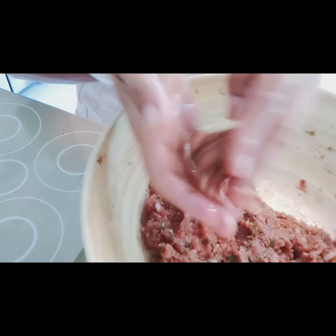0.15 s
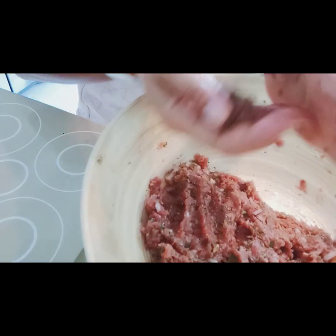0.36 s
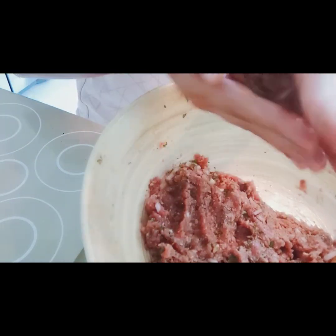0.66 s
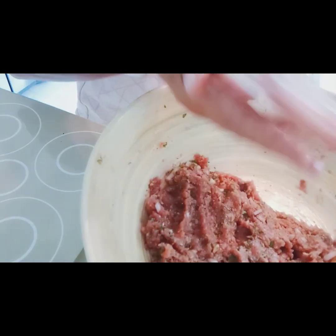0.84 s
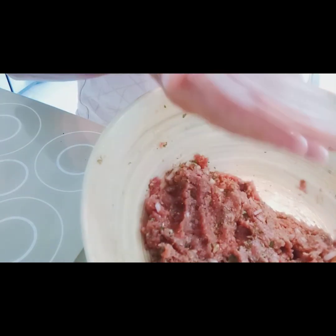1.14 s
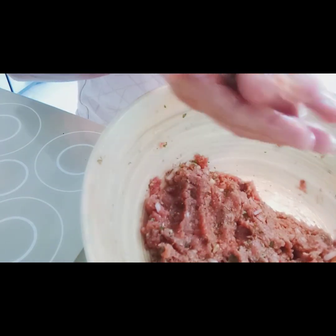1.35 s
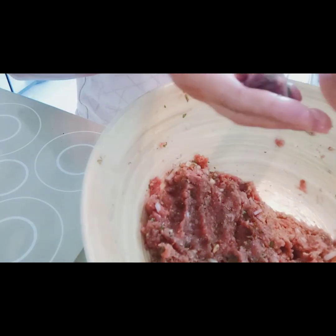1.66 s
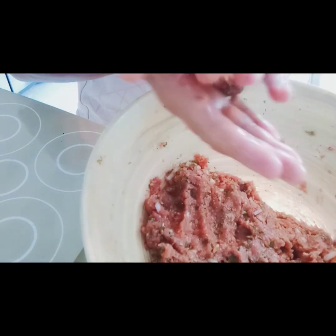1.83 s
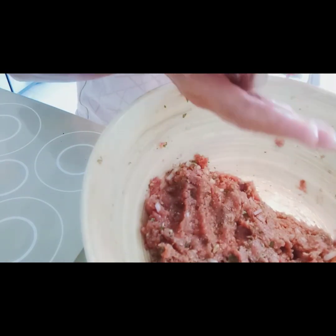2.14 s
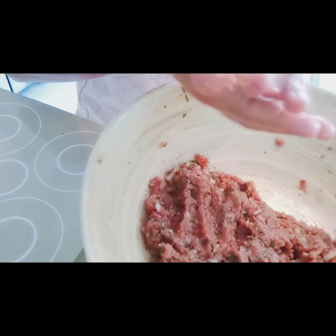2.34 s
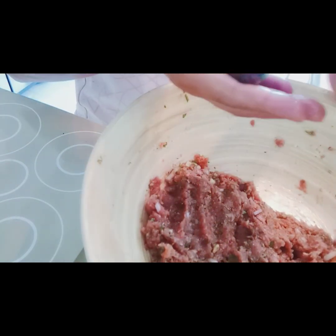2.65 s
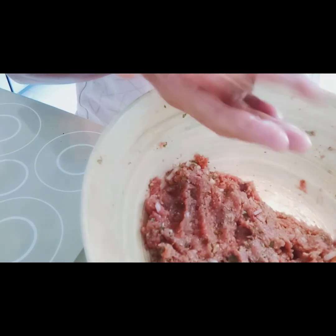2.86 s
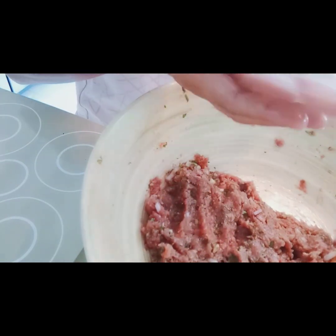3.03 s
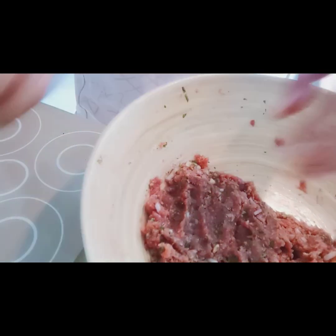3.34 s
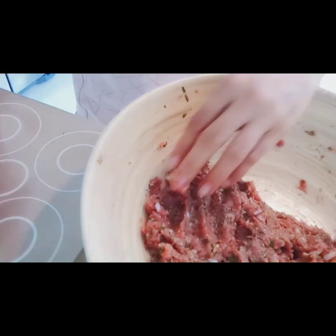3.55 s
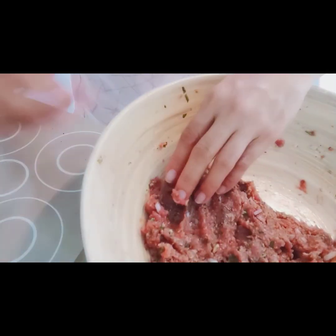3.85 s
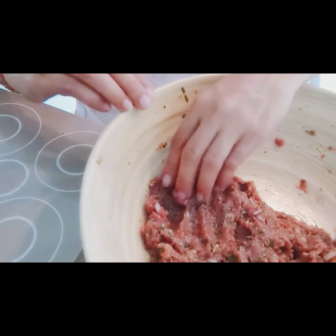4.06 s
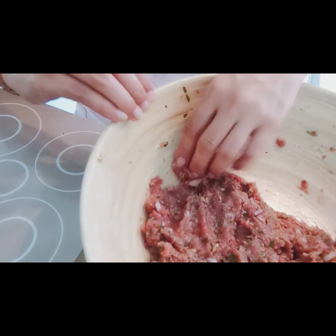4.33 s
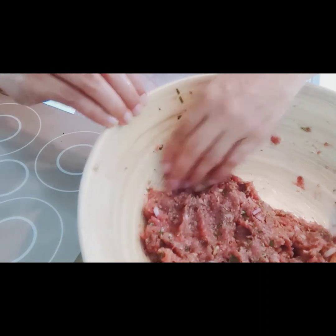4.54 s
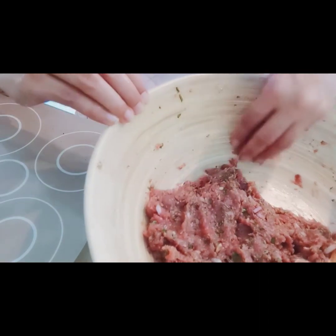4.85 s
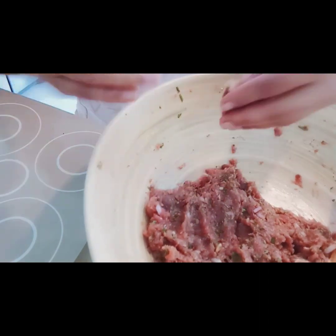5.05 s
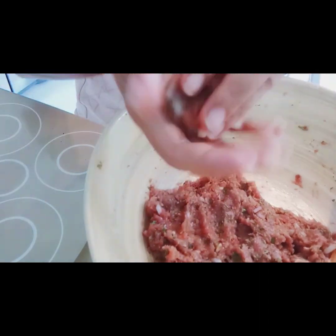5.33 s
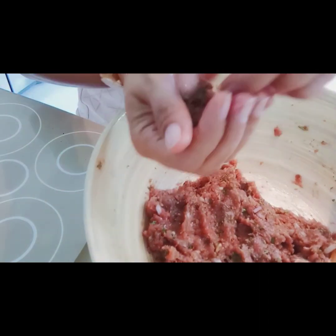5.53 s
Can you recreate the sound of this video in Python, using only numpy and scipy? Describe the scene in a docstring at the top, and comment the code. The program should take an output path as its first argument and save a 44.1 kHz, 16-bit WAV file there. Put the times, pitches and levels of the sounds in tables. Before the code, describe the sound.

In a small kitchen with short reverberation, a steady low hum and muffled rush lie under delicate, close meat handling. A dull soft slap and sparse sticky clicks come first; a hollow drawer rumble swells and booms in the middle, then a shorter roll ends in a knock. Wet crackling pops then cluster loudly as meat is pulled from the bowl, before a final crisp slap and tiny squeak.

```python
"""Hand-rolled meat and a drawer

Wet hands roll a meatball, then pinch fresh meat from a bowl: dense small air resonances give the smearing,
and pops, sharp snaps and slaps mark the meat letting go of the skin or meeting it. Something like a drawer
rumbles open on its runners (random impacts exciting box modes), rolls back and shuts with a knock.
A faint squeak follows; a fridge hums in harmonics of its shaft rate under a steady filtered-noise rush."""
import sys
import numpy as np
from scipy import signal
from scipy.fft import rfft, irfft
from scipy.io import wavfile
from scipy.ndimage import uniform_filter1d

SR = 44100
rng = np.random.default_rng(int(sys.argv[2]) if len(sys.argv) > 2 else 0)


def transcribe(u):
    """Save the signal u as a 16-bit wav file named by the first command-line argument.

    u: samples, shape (n,) or (channels, n), limited to [-1, 1]; the rate is SR.
    q: integer samples, one column per channel.
    """
    v = np.clip(np.atleast_2d(u).T, -1, 1)
    q = np.round(v * 32767).astype(np.int16)
    wavfile.write(sys.argv[1], SR, q)


N = 250929
TIME = np.arange(N) / SR

# Levels in the tables are relative; each source may add its own gain.
# Two spells of soft rubbing: meat in the palms, ending in a faint swish, then in the bowl:
# [t/s, rubbing level/dB]
RUBBING = [
    [(0.3, -75.5), (0.72, -64.5), (1.05, -66.5), (1.4, -90), (1.78, -69), (2.5, -82), (3.1, -71),
     (3.28, -65.5), (3.45, -64.5)],
    [(3.9, -66.5), (4.2, -64), (4.42, -68.5), (4.63, -63), (5.1, -72)],
]
# Meat peeling off the skin: [t/s of letting go, level/dB, length/s]
PEELS = [(0.547, -83, 0.088), (0.728, -77, 0.084), (0.82, -78, 0.035), (1.07, -79, 0.12),
         (1.635, -78, 0.014), (1.703, -74, 0.023), (1.798, -72.5, 0.046), (2.003, -73, 0.055),
         (2.184, -78, 0.056), (2.348, -77.5, 0.035), (2.772, -72.5, 0.022), (2.865, -69.5, 0.051),
         (3.066, -75, 0.033), (4.107, -70.5, 0.055), (4.203, -65, 0.031), (4.333, -68.5, 0.035),
         (4.63, -73, 0.054), (4.777, -84, 0.32), (4.957, -69, 0.035)]
# Larger air pockets opening in the meat: [t/s, level/dB, f/Hz of the pocket]
AIR_POPS = [(0.5241, -43.5, 2150), (0.6387, -44.5, 3260), (0.756, -45, 2030), (0.8202, -44, 1730),
            (0.9338, -38.5, 2880), (1.042, -37, 2030), (1.2694, -43.5, 1990), (1.9753, -38.5, 1960),
            (2.149, -34.5, 2980), (2.8659, -42.5, 3260), (4.0913, -37, 3700), (4.0937, -37, 2910),
            (4.1107, -40, 4000), (4.1229, -45, 3340), (4.2145, -35, 3520), (4.3071, -26, 3500),
            (4.3141, -43, 4260), (4.3307, -38, 3270), (4.5878, -40, 3790), (4.6096, -39, 3230),
            (4.6137, -33.5, 3300), (4.6204, -28.5, 3400), (4.638, -38, 2670), (4.6563, -40, 4050),
            (4.9599, -37.5, 3300), (5.4668, -32, 3220)]
# Sticky threads snapping off the skin; the last tick is the bright edge of the final slap:
# [t/s, level/dB, spectral tilt/(dB per octave)]
SHARP_TICKS = [(0.3525, -49.5, 7), (0.4394, -53, 12), (0.528, -49.5, 1), (0.6916, -58, 5),
               (0.7025, -54, -6), (0.739, -58, 11), (0.7564, -47, 5), (0.8301, -51, 9), (1.331, -53, 2),
               (1.6836, -57, 0), (1.7096, -59, -2), (1.783, -53, -8), (1.794, -53, 1), (1.8238, -52, 1),
               (1.8898, -58, 6), (1.981, -55, 6), (2.021, -51, 9), (2.0339, -45.5, 8), (2.179, -52, -1),
               (2.3358, -54, -5), (2.3708, -58.5, 13), (2.759, -49, 2), (2.771, -52, 0), (2.7763, -48, -21),
               (2.8544, -50, -3), (3.0557, -52, -3), (3.0717, -52, 9), (3.0906, -52.5, -12),
               (3.9755, -55, -2), (4.0567, -56, 10), (4.0834, -51, 2), (4.1652, -52, 6), (4.1964, -50, 4),
               (4.2107, -48, -3), (4.28, -48, -4), (4.3073, -30, -24), (4.3335, -44, -10),
               (4.3631, -55, -8), (4.5607, -55, 12), (4.5737, -45, -25), (4.588, -41.5, 3),
               (4.773, -47.5, -22), (4.8682, -52, -27), (4.973, -50, -4), (5.4938, -46, 0)]
# Soft slaps of meat on skin: [t/s, level/dB, f/Hz of the squeezed air]
SLAPS = [(0.179, -39.5, 554), (4.3438, -35.5, 2150), (5.493, -30, 2000), (5.496, -47, 2220)]
# Spectrum of squelching meat: [f/Hz, level/(dB per Hz)]
SMEAR_SPECTRUM = [(900, -5.5), (1400, 2), (2000, 6), (3600, 5), (4400, -6), (5300, -32), (9000, -33)]
# Spectrum of sharp snaps and crackle: [f/Hz, level/(dB per Hz)]
SNAP_SPECTRUM = [(2000, -7), (3600, 10), (4700, 3), (5500, -8), (6600, 0.5), (7600, -4), (8800, 2.5),
                 (10300, -9), (15500, -9)]
# Drawer pulled out, then pushed shut:
# [start t/s, end of push t/s, time to get going/s, rumble level/dB, slowing/(dB per s)]
DRAWER_RUNS = [(1.718, 2.637, 0.17, -31, 38.5), (3.295, 3.624, 0.11, -37.5, 59)]
# Rollers hitting bumps; the last row is the low boom of the drawer shutting: [t/s, level/dB]
BOX_BOOMS = [(2.07, -34), (2.422, -28.5), (2.505, -20.5), (2.674, -30), (2.938, -36.5), (3.438, -35.5),
             (3.595, -28)]
# Modes of the drawer box: [f/Hz, level/dB, t60/s]
BOX_MODES = [(265, -6, 0.073), (303.5, 4, 0.085), (340.8, 10, 0.16), (686, -11, 0.14)]
# Grinding spectrum of the runners: [f/Hz, level/(dB per Hz)]
RUNNER_SPECTRUM = [(130, -43.5), (220, -11), (270, 3), (350, 0), (410, -27.5), (490, -11.5), (590, -20),
                   (690, -17), (900, -26.5), (1010, -22.5), (1400, -40.5), (2500, -43.5), (5000, -81)]
# Drawer rubbing past its catch, then hitting its stop:
# [t/s, level/dB, rise/s, clatter t60/s, spectral tilt/(dB per octave)]
KNOCKS = [(3.546, -39, 0.0077, 0.14, -9), (3.5898, -41.5, 0.00039, 0.35, 1.5)]
# Spectrum of the knocked wood: [f/Hz, level/(dB per Hz)]
WOOD_SPECTRUM = [(400, -11), (850, -5.5), (1150, 2), (1330, 4.5), (1620, 6), (2000, -6), (2800, -2),
                 (4200, -5.5), (5400, -15.5), (5800, -37), (9000, -46)]
# Modes of the cabinet: [f/Hz, level/dB, t60/s]
CABINET_MODES = [(1155, -1.5, 0.46), (1580, 4.5, 0.18), (1790, -3, 0.11), (2730, -7, 0.11),
                 (3920, -6, 0.18)]
# Harmonics of the compressor shaft: [multiple of SHAFT_HZ, rms level/dB before wavering]
SHAFT_HARMONICS = [(1, -48.5), (2, -46.5), (3, -62), (5, -58.5), (6, -61.5), (7, -60), (8, -66), (12, -67),
                   (13, -70), (15, -66), (62, -76.5)]
# Further tones of the fridge: [f/Hz, rms level/dB before wavering]
FRIDGE_TONES = [(43.4, -67.5), (69.6, -57.5), (129, -62), (241, -58.5)]
# Steady rush of the kitchen: [f/Hz, level/(dB per Hz)]
AIR_SPECTRUM = [(32, -27.5), (65, 0.5), (120, 3.5), (175, 0.5), (270, 6), (370, 3.5), (480, -9), (620, -4),
                (680, -1), (860, -3), (1000, -10), (1600, -16), (2500, -20), (3600, -22), (4500, -35),
                (5300, -47), (9000, -48), (15000, -53.5)]
# Reverberation time of the kitchen: [f/Hz, t60/s]
ROOM_DECAY = [(200, 0.21), (2000, 0.2), (5000, 0.17), (12000, 0.15)]

SMEAR_PER_S, CRACKLE_PER_S, SMEAR_SPREAD_DB = 750, 560, 3.1  # tiny squelches and crackles
SMEAR_CYCLES, CRACKLE_CYCLES = 1.3, 0.9  # decay constants of the tiny pockets, in cycles
CLING, LET_GO = 1, 0.79  # shares of a peel's length over which it builds and dies
POP_CYCLES, POP_RISE_S = 1.6, 0.00025
SNAP_PIVOT_HZ = 7500  # frequency about which a snap's spectrum tilts
GAIN_DB_PER_S = 9  # growth of the rumble while the drawer is pushed
SHAFT_HZ = 56.52  # compressor turns per second
WAVER, FLUTTER_RAD = 0.3, 0.015  # sway of the high tones (share), flutter of the shaft phase
AIR_DB = -50
ROOM_DB, TICK_ROOM_DB = -6, -7  # room's answer to squelches and pops, and to ticks and slaps
EDGE_HZ = 15550  # upper band limit


def kneading(smear_db=-0.5, squelch_db=5, crackle_db=-1, rest_db=-95):
    """Superposition of grains: rubbing is dense squelches; peeling swells squelches and fine crackle."""
    smear = grains(SMEAR_PER_S, SMEAR_SPREAD_DB, low_hz=1400, high_hz=4600,
                   cycles=SMEAR_CYCLES, clump_db=1.5)
    crackle = grains(CRACKLE_PER_S, spread_db=5.5, low_hz=4000, high_hz=15000,
                     cycles=CRACKLE_CYCLES, clump_db=3.0)
    peeling = np.zeros(N)
    for s, db, length in PEELS:
        age = (TIME - s) / length
        width = np.where(age < 0, CLING, LET_GO)
        peeling += amp(db) * np.exp(-(age / width) ** 2)
    squelch_gain = amp(smear_db) * follow(RUBBING) + amp(squelch_db) * peeling
    crackle_gain = amp(rest_db) + amp(crackle_db) * peeling
    squelches = unit(colour(smear, SMEAR_SPECTRUM)) * squelch_gain
    return squelches + unit(colour(crackle, SNAP_SPECTRUM)) * crackle_gain


def follow(curves):
    """Envelope control: gain runs along level curves and fades softly to rest between them."""
    gain = sum(amp(np.interp(TIME, *np.transpose(rows), -200, -200)) for rows in curves)
    return uniform_filter1d(gain, size=SR // 50)


def grains(per_s, spread_db, low_hz, high_hz, cycles, clump_db, count=12):
    """Impulse excitation: random impulses set pockets of many sizes ringing, in clumps; rms 1."""
    out = np.zeros(N)
    for hz in np.linspace(low_hz, high_hz, count):
        impulses = clicks(per_s / count, spread_db)
        out += unit(signal.oaconvolve(impulses, pocket(hz, cycles))[:N])
    return unit(out * amp(clump_db * drift(rate_hz=23)))


def pocket(hz, cycles, rise_s=0.000083, glide=0.005):
    """Damped resonance: an air pocket rings for a few cycles, its pitch rising as it opens; peak 1."""
    t = np.arange(SR // 80) / SR
    age = t * hz / cycles
    pitch = hz * (1 + glide * np.tanh(age - 1))
    envelope = (1 - np.exp(-t / rise_s)) * np.exp(-age)
    ring = envelope * np.sin(2 * np.pi * np.cumsum(pitch) / SR)
    return ring / abs(ring).max()


def pops(pop_db=-2.0, film_db=-12.0, film_tilt_db=-17):
    """Sudden release: an air pocket rings as its film snaps; the bigger the pop, the louder the snap."""
    out = np.zeros(N)
    for s, db, hz in AIR_POPS:
        burst = pocket(hz, POP_CYCLES, POP_RISE_S) + amp(film_db) * snap(film_tilt_db)
        add(out, s, amp(db + pop_db) * burst)
    return out


def snap(tilt_db, hiss_db=-13, hiss_s=0.0014):
    """Impulsive excitation: one sharp click and the briefest hiss, as of a wet film parting; peak 1."""
    t = np.arange(SR // 80) / SR
    hiss = rng.standard_normal(len(t)) * np.exp(-t / hiss_s)
    burst = (t == 0) + amp(hiss_db) * hiss
    click = colour(burst, tilted(SNAP_SPECTRUM, tilt_db, SNAP_PIVOT_HZ))
    return click / abs(click).max()


def ticks(tick_db=1.0):
    """Impulsive release: sticky threads snap off the skin; the last tick edges the final slap."""
    out = np.zeros(N)
    for s, db, tilt_db in SHARP_TICKS:
        add(out, s, amp(db + tick_db) * snap(tilt_db))
    return out


def slaps(thud_hz=400, thud_db=-2, palm_hz=1030, palm_db=-10, splash_db=-4, splash_s=0.00076, wet_hz=2100):
    """Soft impact: a dull thud, a hollow palm note, a chirp of trapped air and a wet noise splash."""
    t, out = np.arange(SR // 80) / SR, np.zeros(N)
    for s, db, hz in SLAPS:
        splash = colour(rng.standard_normal(len(t)) * np.exp(-t / splash_s), SMEAR_SPECTRUM)
        thud = amp(thud_db) * pocket(thud_hz, cycles=0.44, rise_s=0.0007)
        palm = amp(palm_db) * pocket(palm_hz, cycles=2.2, rise_s=0.00034)
        chirp = pocket(hz, cycles=0.98, rise_s=0.00021)
        wetness = amp(splash_db) * hz / wet_hz  # dull slaps splash weakly
        add(out, s, amp(db) * (chirp + thud + palm + wetness * splash))
    return out


def drawer(grind_db=-3, judder_db=-6, boom_db=-1, scrape_db=-58, scrape_hz=1250):
    """Rolling excitation: rollers grind, judder and scrape when fast; bumps and the shutting boom the box."""
    t = np.arange(SR // 5) / SR
    box = modes(BOX_MODES, t) * (1 - np.exp(-t / 0.0024))
    speed = travel()
    grind = steadied(colour(clicks(per_s=1500, spread_db=2.0), RUNNER_SPECTRUM))
    judder = steadied(signal.oaconvolve(clicks(per_s=160, spread_db=3.0), box)[:N])
    scratch = pocket(scrape_hz, cycles=0.51, rise_s=0.0015)
    scrape = unit(signal.oaconvolve(clicks(per_s=440, spread_db=-0.5), scratch)[:N])
    out = speed * (amp(grind_db) * grind + amp(judder_db) * judder)
    out += amp(scrape_db) * scrape * (speed / speed.max()) ** 2
    for s, db in BOX_BOOMS:
        add(out, s, amp(db + boom_db) * box / abs(box).max())
    return out


def travel():
    """Kinematic gain following the drawer's speed: it gets going, gathers pace, then coasts to rest."""
    speed = np.zeros(N)
    for start, end, rise_s, db, slowing in DRAWER_RUNS:
        going = 1 - np.exp(-(np.maximum(TIME - start, 0) / rise_s) ** 2)
        change_db = np.minimum(GAIN_DB_PER_S * (TIME - end), slowing * (end - TIME))
        speed += going * amp(db + change_db)
    return speed


def knocks(crack_db=7, crack_s=0.002, clatter_db=-3.5, clatter_tilt_db=-11, ring_db=-7):
    """Impact and modal response: a crack, a brief duller clatter, and the cabinet set ringing."""
    t, out = np.arange(SR // 3) / SR, np.zeros(N)
    ring = modes(CABINET_MODES, t)
    for s, db, rise_s, t60, tilt_db in KNOCKS:
        crack = amp(crack_db) * np.exp(-t / crack_s) * rng.choice([-1, 1], len(t))
        clatter = clicks(per_s=4700, spread_db=-1.0)[:len(t)] * amp(clatter_db - 60 * t / t60)
        wood = tilted(WOOD_SPECTRUM, tilt_db, pivot_hz=2800)
        dull_wood = tilted(wood, clatter_tilt_db, pivot_hz=4000)
        blow = colour(crack, wood) + colour(clatter, dull_wood)
        blow += amp(ring_db + tilt_db) * ring  # a brighter blow rings the cabinet more
        add(out, s, amp(db) * blow * (1 - np.exp(-(t / rise_s) ** 2)))
    return out


def modes(table, t):
    """Modal superposition: a sum of exponentially decaying sinusoids."""
    return sum(amp(db - 60 * t / t60) * np.sin(2 * np.pi * hz * t) for hz, db, t60 in table)


def squeak(s=5.562, length_s=0.059, hz=1630, db=-54.0, rough=0.18):
    """Phase modulation: one faint tone made unsteady by random phase (rough, in radians)."""
    t, out = np.arange(int(length_s * SR)) / SR, np.zeros(N)
    phase = 2 * np.pi * hz * t + rough * drift(rate_hz=230)[:len(t)]
    add(out, s, amp(db) * np.hanning(len(t)) * np.sin(phase))
    return out


def fridge(wander=0.039, waver_hz=500):
    """Harmonic series of a rotating shaft, plus tones: low ones steady, high ones wavering and blurred."""
    out = np.zeros(N)
    slip = wander * drift(rate_hz=1.6) + FLUTTER_RAD * drift(rate_hz=27)  # shaft phase, radians
    sways = [drift(rate_hz=14) for _ in range(3)]
    tones = [(order * SHAFT_HZ, db) for order, db in SHAFT_HARMONICS] + FRIDGE_TONES
    for k, (hz, db) in enumerate(tones):
        phase = 2 * np.pi * (hz * TIME + rng.random()) + slip * hz / SHAFT_HZ
        waver = 1 + WAVER * np.tanh(hz / waver_hz) * sways[k % len(sways)]
        out += np.sqrt(2) * amp(db) * np.sin(phase) * waver
    return out


def air(patch_db=4.0, patch_hz=260, patch_s=0.08):
    """Filtered noise: the soft rush of fan and room, shifting in patches of pitch and time."""
    hz, age, z = signal.stft(rng.standard_normal(N), SR, nperseg=1024)
    bins = max(round(patch_hz / hz[1]), 1)
    frames = max(round(patch_s / age[1]), 1)
    patches = uniform_filter1d(rng.standard_normal(z.shape), bins, axis=0)
    patches = unit(uniform_filter1d(patches, frames, axis=1))
    # share of patch_db by frequency: the range near 5 kHz shifts most
    depth_db = patch_db * read([(500, 0.28), (1500, 0.74), (5000, 1), (9000, 0.4)], hz)
    rush = signal.istft(z * amp(depth_db[:, None] * patches), SR, nperseg=1024)[1][:N]
    return amp(AIR_DB) * unit(colour(rush, AIR_SPECTRUM))


def kitchen(x, early_db=-3, early_s=0.016):
    """Reverberation: quick reflections off bowl and worktop, then the tail of a small hard room."""
    t = np.arange(SR // 2) / SR
    taps = rng.standard_normal(len(t)) * (rng.random(len(t)) < 0.1) * (t > 0.002)
    taps *= 1 + amp(early_db) * np.exp(-t / early_s)
    hz, age, z = signal.stft(taps, SR, nperseg=256)
    decay = amp(-60 * age / read(ROOM_DECAY, hz)[:, None])
    tail = signal.istft(z * decay, SR, nperseg=256)[1]
    return signal.oaconvolve(x, tail / np.linalg.norm(tail))[:N]


def amp(db):
    """Decibel definition: amplitude ratio for a level."""
    return 10 ** (np.asarray(db) / 20)


def unit(x):
    """Normalisation to rms 1."""
    return x / np.sqrt(np.mean(x ** 2) + 1e-20)


def steadied(x):
    """Automatic gain: evens out slow swells and keeps the quick flutter; rms near 1."""
    return x / np.sqrt(uniform_filter1d(x ** 2, size=SR // 9) + 1e-9)


def read(points, hz):
    """Interpolation of [f/Hz, value] points on a logarithmic frequency axis."""
    f, value = np.transpose(points)
    return np.interp(np.log(hz + 1), np.log(f), value)


def tilted(points, db_per_octave, pivot_hz):
    """Spectral tilt about a pivot, held constant below -0.3 and above +0.8 octave from it."""
    return [(hz, db + db_per_octave * np.clip(np.log2(hz / pivot_hz), -0.3, 0.8)) for hz, db in points]


def colour(x, points):
    """Minimum-phase filtering: a causal filter of unit energy with the given spectrum."""
    log_gain = np.log(amp(read(points, abs(np.fft.fftfreq(4096, 1 / SR)))))
    response = np.exp(np.conj(signal.hilbert(log_gain)))  # phase from the log gain
    taps = np.fft.ifft(response).real[:len(log_gain) // 2]
    return signal.oaconvolve(x, taps / np.linalg.norm(taps))[:len(x)]


def drift(rate_hz):
    """Low-passed noise: a slow random signal of rms 1."""
    hz = np.fft.rfftfreq(N, 1 / SR)
    return unit(irfft(rfft(rng.standard_normal(N)) / (1 + (hz / rate_hz) ** 4), N))


def clicks(per_s, spread_db):
    """Random impulse train: chance times and signs, exponentially spread levels; rms 1."""
    at = np.flatnonzero(rng.random(N) < per_s / SR)
    chance, side = rng.random((len(at), 2)).T
    size_db = spread_db * np.minimum(-np.log(1 - chance), 3)
    out = np.zeros(N)
    out[at] = np.sign(side - 0.5) * amp(size_db)
    return unit(out)


def add(mix, s, sound):
    """Superposition: adds a sound to the mix from time s, in seconds."""
    part = mix[max(round(s * SR), 0):][:len(sound)]
    part += sound[:len(part)]


def scene():
    """Superposition of the close hand sounds and their room, with drawer, squeak, fridge and air behind."""
    meat = pops() + kneading()
    sticky = ticks() + slaps()
    room = kitchen(amp(ROOM_DB) * meat + amp(TICK_ROOM_DB) * sticky)
    behind = drawer() + knocks() + squeak() + fridge() + air()
    return (meat + sticky + room + behind)[None]


def record(dry):
    """Band limiting: a linear-phase low-pass filter removes the top of the spectrum."""
    low_pass = signal.firwin(511, EDGE_HZ, window=("kaiser", 9), fs=SR)
    return signal.oaconvolve(dry, low_pass[None], "same")


dry = scene()
out = record(dry)
transcribe(out)
```